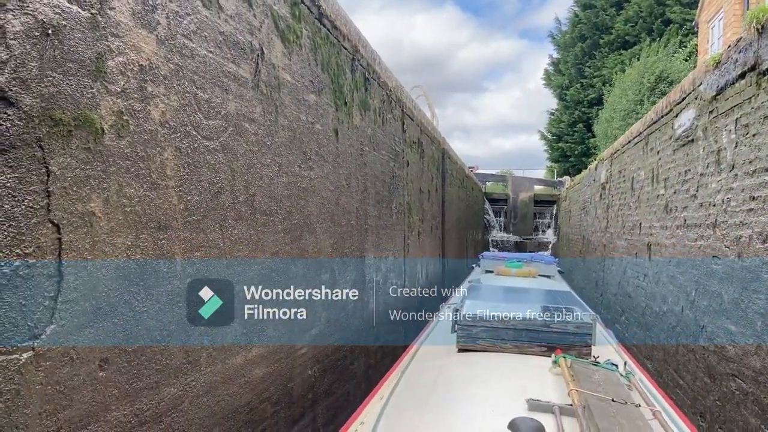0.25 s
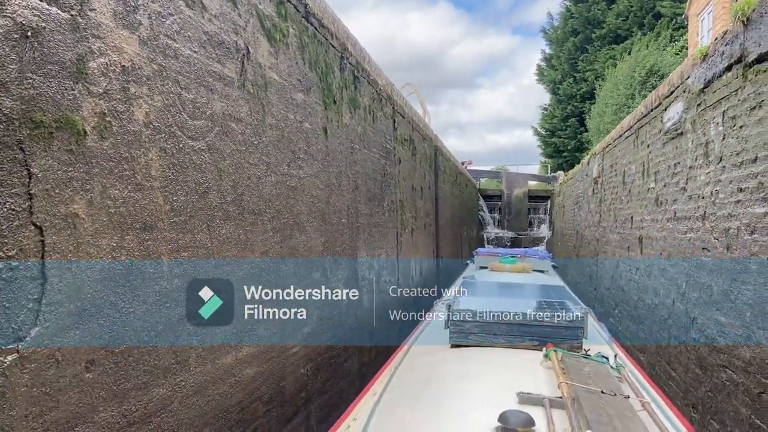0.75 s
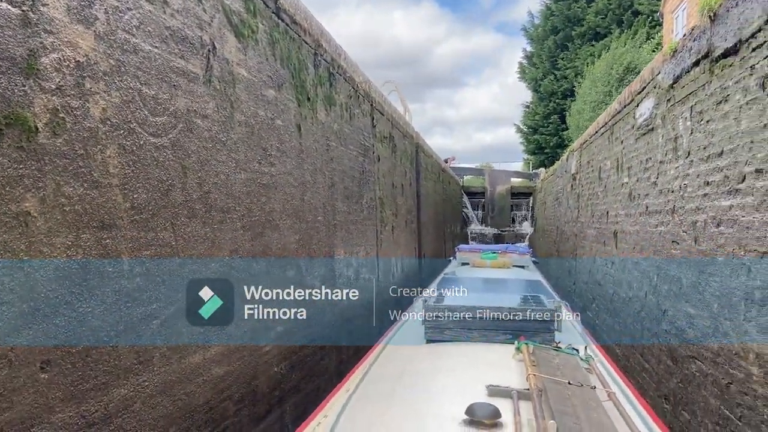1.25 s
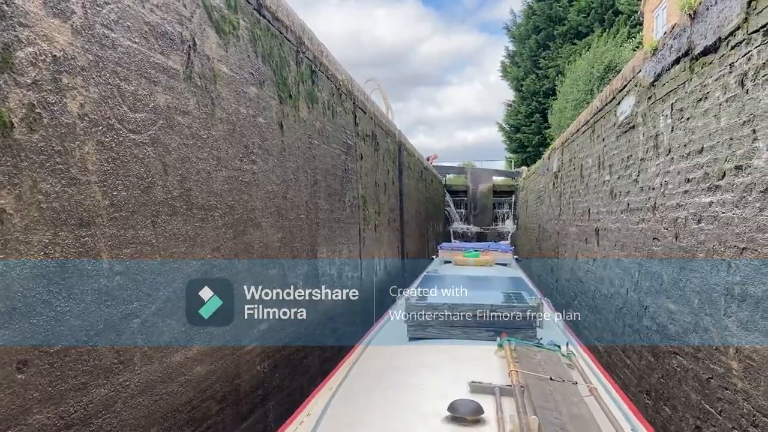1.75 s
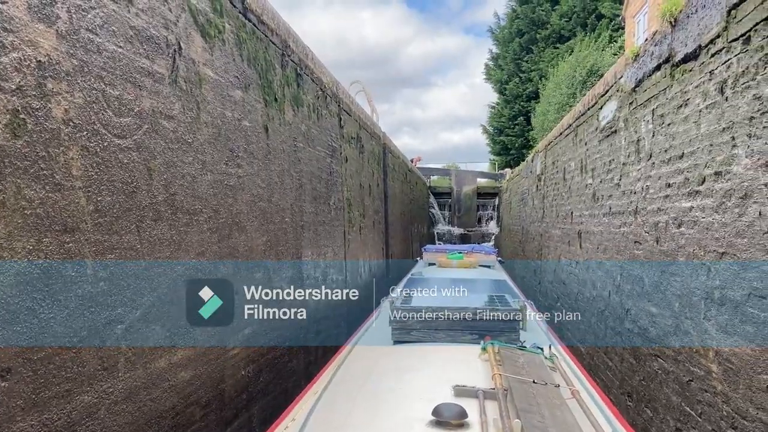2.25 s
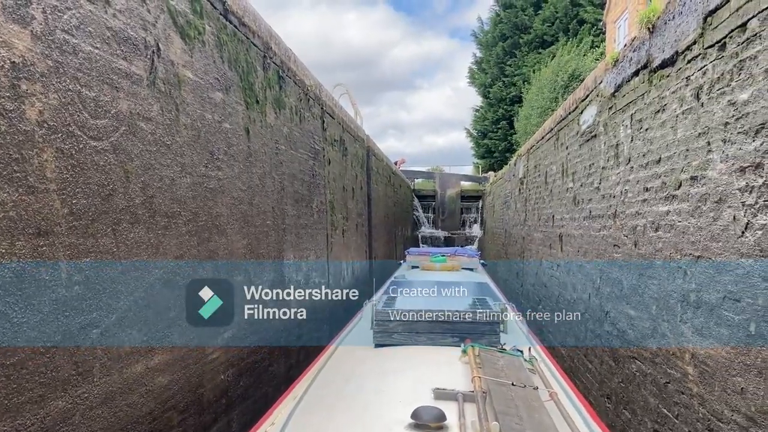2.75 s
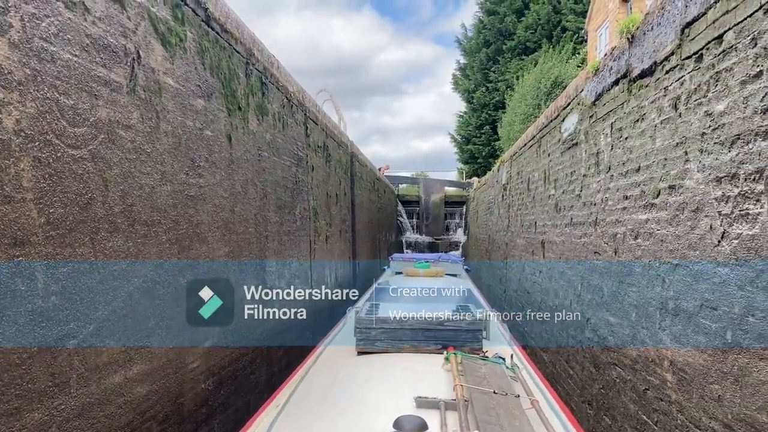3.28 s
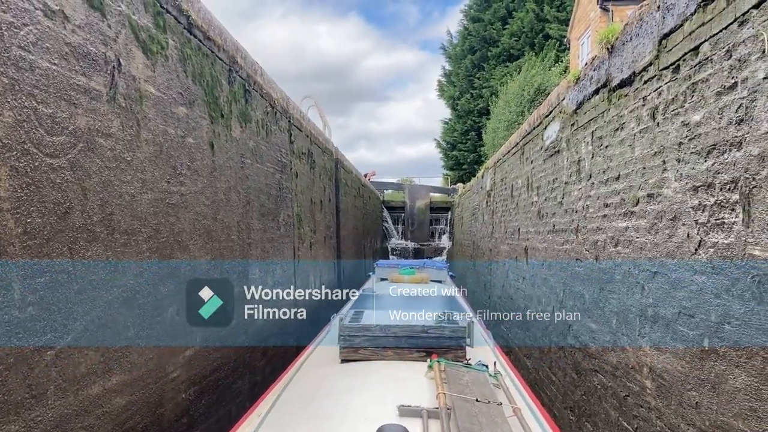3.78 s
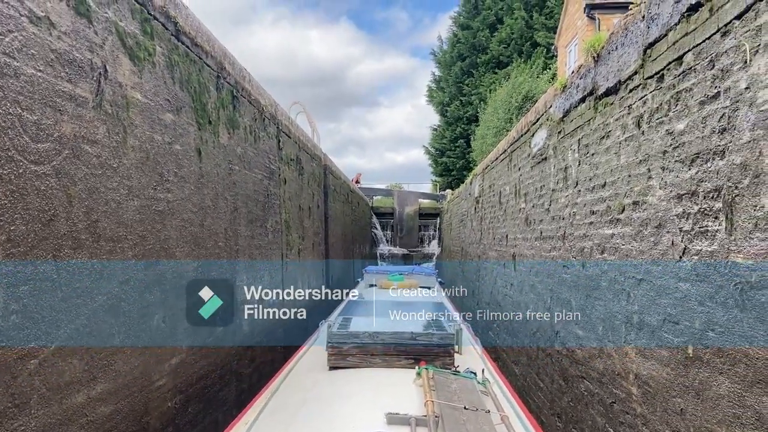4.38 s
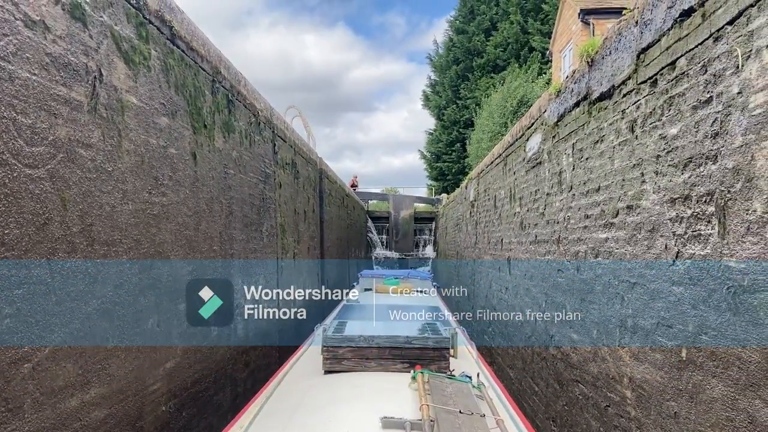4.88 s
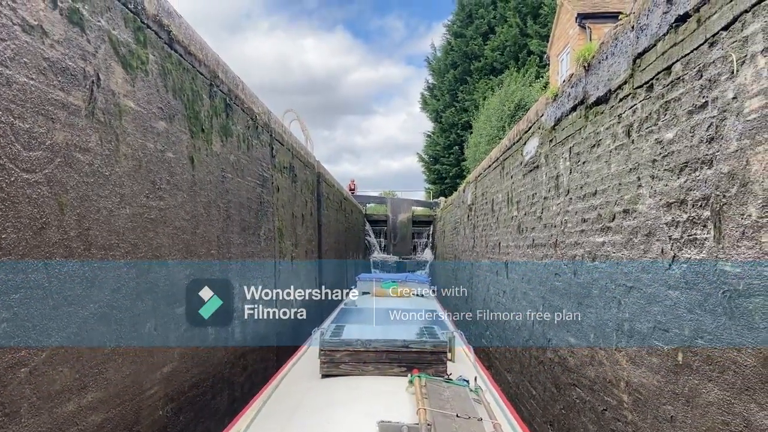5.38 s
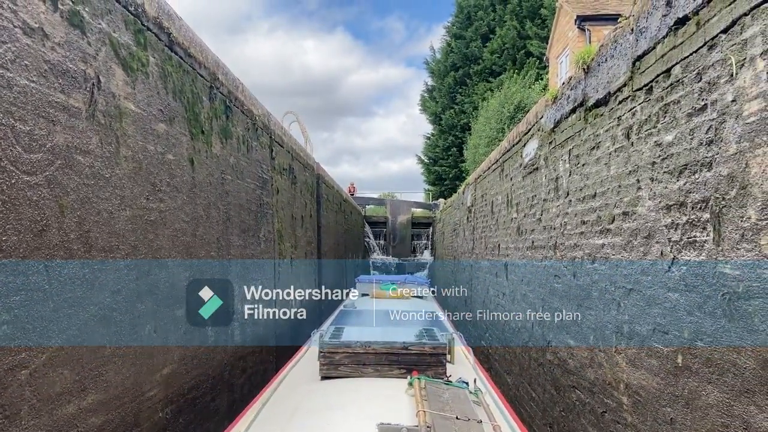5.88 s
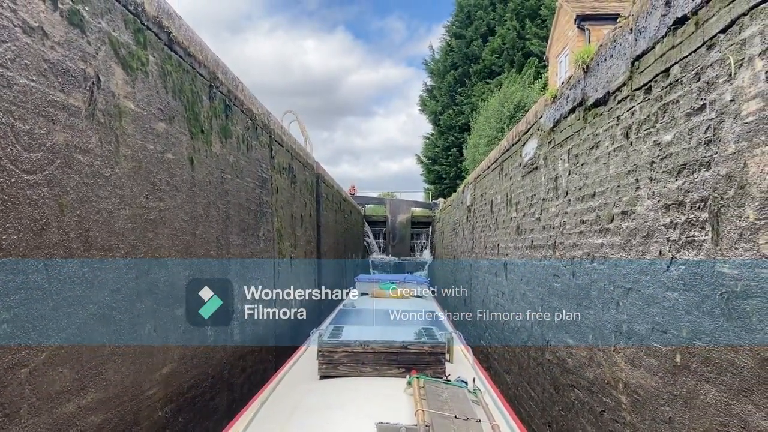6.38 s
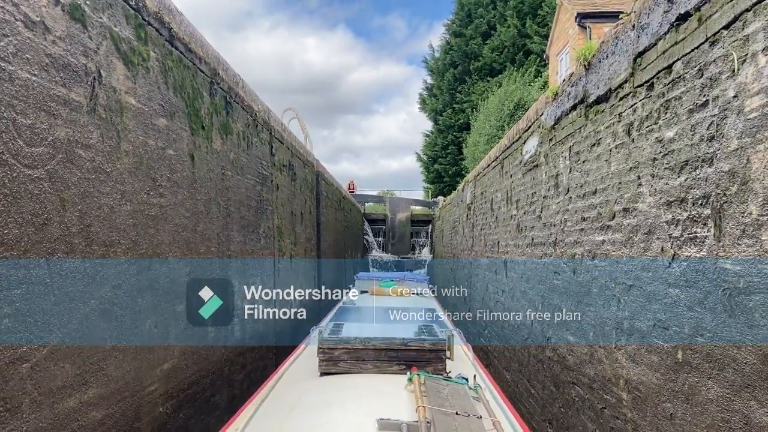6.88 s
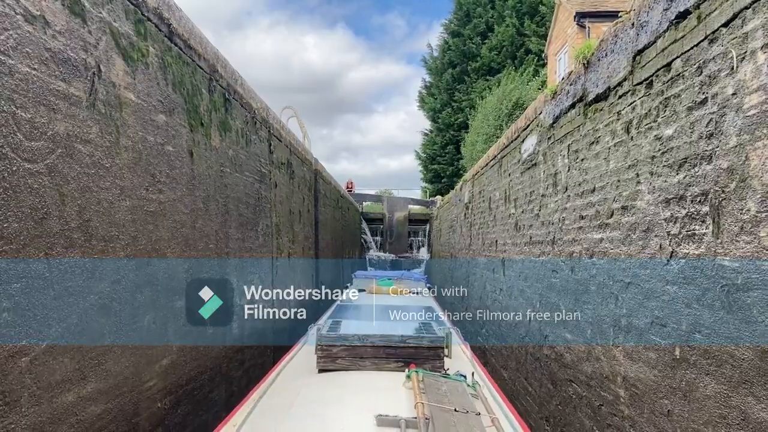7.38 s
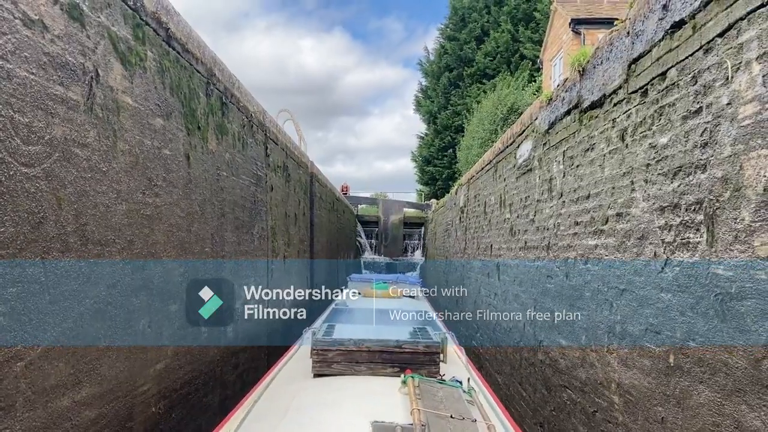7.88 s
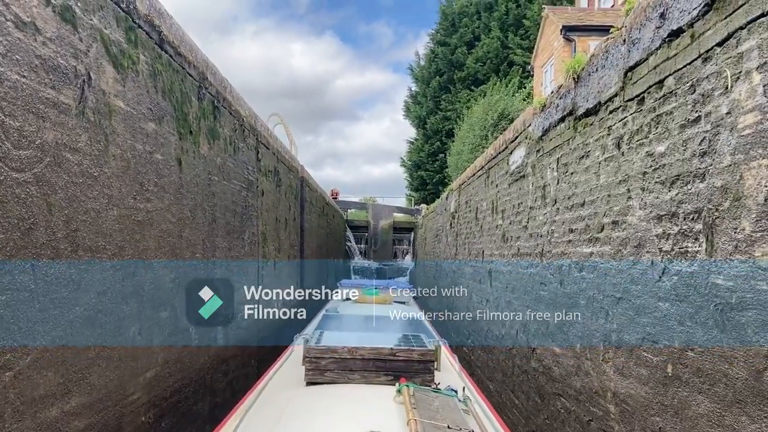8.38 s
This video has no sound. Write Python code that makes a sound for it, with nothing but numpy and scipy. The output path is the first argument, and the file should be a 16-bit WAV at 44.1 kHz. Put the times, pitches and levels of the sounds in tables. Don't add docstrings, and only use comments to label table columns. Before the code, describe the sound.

A dense wash of falling water and a low four-cylinder diesel throb run from start to finish between close, hard walls. Heavy low wind thuds hit the phone microphones repeatedly at first, some clipping and making the water dip. Around the middle the gusts thin out, leaving a steady roar, drone and occasional deep bubble glugs, with another thump near the end.

```python
import sys
import numpy as np
from scipy import signal
from scipy.fft import rfft, irfft
from scipy.io import wavfile
from scipy.ndimage import uniform_filter1d

SR = 44100
rng = np.random.default_rng(int(sys.argv[2]) if len(sys.argv) > 2 else 0)


def attenuation_scalar(level_db):
    decades = np.asarray(level_db, float) / 20
    return 10 ** decades


def generate_wav(signal):
    frames = np.transpose(np.atleast_2d(signal))
    scaled = np.clip(frames, -1, 1) * 32767
    pcm = np.round(scaled).astype(np.int16)
    wavfile.write(sys.argv[1], SR, pcm)


N = 381024
T = np.arange(N) / SR
HZ = np.arange(N // 2 + 1) * SR / N + 1e-3

# peak time in seconds, peak in dB, eddy pitch in Hz, flutter share in dB.
GUSTS = [(0.054, -15.5, 56, -5), (0.235, -17.5, 62, 0.5), (0.356, -8, 71, -9), (0.603, -16, 57, -11),
         (0.773, -15, 56, -13), (0.866, -26, 68.5, -4.5), (1.073, -4, 53.4, -11), (1.125, -8.5, 52, -10),
         (1.246, -24, 61, -21), (1.32, -7.5, 60, -17), (1.436, -7.5, 55.7, -14), (1.56, -20, 58.3, -16),
         (1.881, -15, 54.5, -16), (1.971, -5.5, 70, -9.5), (2.103, -16, 65.4, -6.5), (2.368, -6, 65, -10),
         (2.537, -12, 68, -7), (2.675, -3.5, 62, -16.5), (3.136, -17.5, 56, -10), (3.264, -23, 58.6, -15),
         (3.58, -12, 60, -18), (3.935, -16, 60, -6), (4.091, -4.5, 62, -15.5), (4.275, -20, 53.7, -18),
         (4.396, -10, 56.7, -13), (4.611, -4.5, 67, -24), (4.719, -11.5, 65, -13), (5.751, -7.5, 77, -28),
         (5.823, -15, 70, -21), (8.162, -7, 66, -24)]


def unit(x):
    return x / np.sqrt(np.mean(x ** 2))


def curves(table, at=T):
    s, *columns = np.transpose(table)
    return [np.interp(at, s, c) for c in columns]


def by_hz(table):
    hz, *rest = np.transpose(table)
    return curves(np.transpose([np.log(hz), *rest]), np.log(HZ))


def walk(rate):
    hold = int(SR / rate)
    steps = np.repeat(rng.standard_normal(N // hold + 1), hold)
    return 1.65 * uniform_filter1d(uniform_filter1d(steps, hold), hold)[:N]


def band(x, hz, width_hz, order=2):
    return irfft(rfft(x) / (1 + ((HZ - hz ** 2 / HZ) / width_hz) ** 2) ** order, N)


def walls():
    echo_db = -13
    lags_s = rng.uniform(.004, .03, (6, 2, 1))
    echoes = np.exp(-2j * np.pi * HZ * lags_s).sum(axis=0)
    return np.abs(1 + attenuation_scalar(echo_db) / (1 + (HZ / 2500) ** 2) * echoes)


def splashes(rate, spread_db):
    hits = (rng.random(N) < rate / SR) * rng.standard_normal(N) * attenuation_scalar(spread_db * rng.exponential(size=N))
    age = np.arange(SR // 4) / SR
    smear = rfft(rng.standard_normal(len(age)) * np.exp(-age / 0.021), N)
    return rfft(unit(hits)) * smear / np.abs(smear)


def water():
    # frequency in Hz, level in dB per Hz, left minus right in dB.
    fall = [(25, -15, 2), (82, 4, -5.5), (208, -0.5, -1.5), (424, -2.5, -2), (680, -6.5, 0.5),
            (1020, -7.5, -1), (1780, -9, -0.5), (2840, -13.5, 3), (4980, -16, 2.5), (5970, -19.5, 4.5),
            (7050, -17.5, 1), (8600, -20, 1), (10960, -20, -0.5), (15900, -32, 0)]
    # centre in Hz, width in Hz, level in dB.
    chamber = [(305, 30, -9.5), (423, 62, -11.5), (500, 51, -11.5), (827, 110, -7), (1092, 54, -7.5),
               (1154, 34, -3), (1650, 160, -19), (2350, 390, -12)]
    # frequency in Hz, likeness from 0 to 1, phase by which left leads in radians.
    ports = [(80, .92, 0), (300, .68, .3), (700, .3, 1.0), (1100, .4, .5), (1900, .3, .5), (3000, .65, .5),
             (4600, .68, .2), (5700, .35, -.3), (6400, .9, .15), (7200, .94, .05), (8800, .993, 0)]
    port_lag_s, in_step_hz, top_hz = 2.3e-4, 6900, 15750
    spray_sway_db = -0.57

    (colour_db, pan_db), (like, lead) = by_hz(fall), by_hz(ports)
    resonance = sum(attenuation_scalar(db) / (1 + (2 * (HZ - hz) / width) ** 2) for hz, width, db in chamber)
    colour = attenuation_scalar(colour_db) * (1 + resonance)
    above = np.maximum(HZ - in_step_hz, 0)
    lead = lead - 2 * np.pi * (port_lag_s * above + .11 * (above / 8200) ** 3)
    near, other = splashes(9000, 1.9), splashes(9000, 2.1)
    left = near * np.exp(1j * lead) * attenuation_scalar(pan_db / 2)
    right = (like * near + np.sqrt(1 - like ** 2) * other) * attenuation_scalar(-pan_db / 2)
    pair = colour * walls() * (HZ < top_hz) * np.array([left, right])

    treble_db = spray_sway_db * walk(6)
    octave, out, surge = np.log2(HZ), 0, walk(21)
    for centre in np.arange(4, 15):
        share = np.clip(1 - np.abs(octave - centre), 0, 1)
        high = np.clip((centre - 11) / 3, 0, 1)
        flicker_db = (0.27 + 0.62 * high) * walk(12)
        db = 0.27 * high * surge + flicker_db + high * treble_db
        out = out + attenuation_scalar(db) * irfft(share * pair, N)
    turn_db = np.interp(T, [2.5, 4.0], [.6, -.3])
    return unit(out) * attenuation_scalar(-20 + np.outer([.5, -.5], turn_db))


def bubbles(count=1200):
    out = np.zeros((2, N))
    age = np.arange(SR // 25) / SR
    for when, pitch, size, side in rng.random((count, 4)):
        hz = 600 * 5.5 ** pitch
        cycles = hz * age
        swell = cycles / 6.5 * np.exp(1 - cycles / 5.9)
        ring = np.sin(2 * np.pi * cycles * (1 + 0.00577 * cycles)) * swell
        at = int(when * (N - len(age)))
        db = -38 + 6 * size - 5 * pitch + 8 * (side - .5) * np.array([1, -1])
        out[:, at:at + len(age)] += np.outer(attenuation_scalar(db), ring)
    return out


def glugs():
    # start in seconds, pitch in Hz, level in dB, left minus right in dB.
    big_bubbles = [
        (3.57, 366, -30, -4),
        (5.72, 480, -30, -3),
        (6.39, 398, -30, -2),
        (6.5, 388, -24, -3),
        (8.05, 680, -34, -4),
        (8.27, 500, -27, -3),
    ]
    out = np.zeros((2, N))
    age = np.arange(SR // 5) / SR
    for s, hz, db, pan_db in big_bubbles:
        swell = age / 0.01 * np.exp(1 - age / 0.017)
        ring = np.sin(2 * np.pi * hz * age * (1 + 1.23 * age)) * swell
        start = int(s * SR)
        out[:, start:start + len(age)] += np.outer(attenuation_scalar(db + np.array([pan_db, -pan_db]) / 2), ring)
    return out


def drip():
    s, hz, db = 3.259, 5100, -26
    puff = (T > s) * np.exp(-np.abs(T - s) / 0.0044) * rng.standard_normal(N)
    tick = band(puff, hz, 1500, order=1)
    return attenuation_scalar(db) * tick / np.max(np.abs(tick)) * 3


def propeller():
    hum = np.sin(2 * np.pi * 79.0 * T + .5 * walk(2.2)) * attenuation_scalar(1.5 * walk(2.5))
    return np.outer(attenuation_scalar([-21.4, -19.4]), hum)


def engine():
    # multiple of the engine cycle, left level in dB, right level in dB.
    orders = [(4, -20.7, -17.9), (5, -35.5, -32.4), (6, -32.1, -28.4), (7, -27.7, -23.2), (8, -16.4, -13.2),
              (9, -27.7, -21.2), (10, -35.6, -26.6), (11, -51.2, -37.3), (12, -26.9, -38.6),
              (13, -39.0, -38.8), (16, -21.5, -22.1), (18, -39.5, -37.2), (19, -40.5, -35.8),
              (20, -24.3, -24.8), (21, -41.0, -37.9), (23, -36.9, -39.0), (24, -31.4, -27.6),
              (25, -37.9, -35.5), (27, -58.2, -38.9), (28, -42.2, -31.7), (32, -33.5, -30.4)]
    # time in seconds, lead over an even turn in milliseconds.
    crank_lead = [(0.3, -1.69), (1.3, -0.58), (2.0, 0.65), (2.9, 1.3), (3.5, 1.15), (4.8, 0.06),
                  (5.9, -0.4), (6.9, -0.13), (7.8, -0.46), (8.3, -0.29)]
    cycle_hz = 8.0368
    inverted = (12, 32)

    turn = 2 * np.pi * cycle_hz * (T + curves(crank_lead)[0] / 1000 + 6e-5 * walk(5))
    load = [walk(3) for _ in range(4)]
    out = 0
    for multiple, *db in orders:
        even = multiple % 4 == 0
        phase = multiple * (turn - .19) + 3.9 if even else multiple * (turn + 1.38) - 4.5
        phase = phase + np.pi * (multiple in inverted)
        phase = phase - .8 * (multiple == 8)
        uneven_db = (.4 if even else 1.5) * load[int(multiple) % 4]
        out = out + np.outer(attenuation_scalar(db), np.sqrt(2) * attenuation_scalar(uneven_db) * np.cos(phase))
    return out


def buffet(hz, width_hz):
    x = band(rng.standard_normal(N), hz, width_hz)
    return unit(x / (np.abs(signal.hilbert(x)) + 0.17 * np.std(x)))


def wind():
    # time in seconds, level in dB.
    breeze_level = [(0.0, -16.5), (0.7, -25), (1.3, -14), (2.5, -16.5), (2.9, -23), (3.5, -25), (4.7, -21),
                    (5.2, -22), (8.64, -26.5)]
    gust_side_db, side_per_flutter = -13, 0.44

    breeze = attenuation_scalar(curves(breeze_level)[0] - 1.0)
    mid, side = breeze * buffet(55, 74), breeze * attenuation_scalar(-7.0) * buffet(58, 80)
    churn, flutter, odd = buffet(45.3, 84), buffet(121, 208), buffet(75, 100)
    for (s, db, hz, flutter_db), (start, glide) in zip(GUSTS, rng.random((len(GUSTS), 2))):
        span = slice(max(int((s - .2) * SR), 0), int((s + .2) * SR))
        age = T[span] - s
        swell = attenuation_scalar(db) * np.exp(-(age / 0.038) ** 2)
        eddy = np.cos(2 * np.pi * (0.963 * hz * age * (1 + 7.8 * (glide - .5) * age) + start))
        mid[span] += swell * (eddy + 0.87 * churn[span] + attenuation_scalar(flutter_db + 3.0) * flutter[span])
        side[span] += swell * attenuation_scalar(gust_side_db + side_per_flutter * flutter_db) * odd[span]
    return .85 * np.tanh(np.array([mid + side, 1.05 * mid - side]) / .85)


def gain_control_db():
    duck_db, duck_attack_s, duck_release_s = -3, 0.051, 0.18
    snap_db, snap_from_db, snap_late_s, snap_release_s = -0.58, -9.5, 0.0069, 0.086
    s, db = np.transpose(GUSTS)[:2, :, None]
    coarse = T[::64]
    age = np.maximum(coarse - s, 0)
    duck = duck_db * attenuation_scalar(db) * (1 - np.exp(-age / duck_attack_s)) * np.exp(-age / duck_release_s)
    excess_db = np.maximum(db - snap_from_db, 0)
    snap = snap_db * excess_db * (age > snap_late_s) * np.exp(-age / snap_release_s)
    return np.interp(T, coarse, (duck + snap).sum(axis=0))


def scene():
    # time in seconds, level in dB.
    slow_level = [(0.0, -1.14), (1.5, -0.9), (2.9, -1.5), (3.6, -0.1), (5.2, -0.15), (6.1, -0.44), (7.3, 0.1),
                  (8.64, 0)]
    ducking_db = curves(slow_level)[0] + 1.13 + gain_control_db()
    lock = (water() + bubbles()) * attenuation_scalar(ducking_db) + glugs() + drip()
    boat = (engine() + propeller()) * attenuation_scalar(0.95 * ducking_db - 1.07)
    return lock + boat + wind()


def low_pass(x):
    return signal.sosfilt(signal.butter(12, 16290, fs=SR, output="sos"), x)


def record(dry):
    x = signal.sosfilt(signal.butter(2, 22, "high", fs=SR, output="sos"), dry)
    return low_pass(np.clip(x, -1, 1))


dry = scene()
out = record(dry)
generate_wav(out)
```